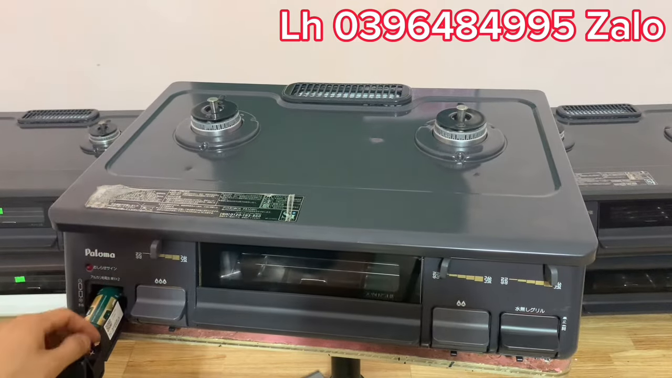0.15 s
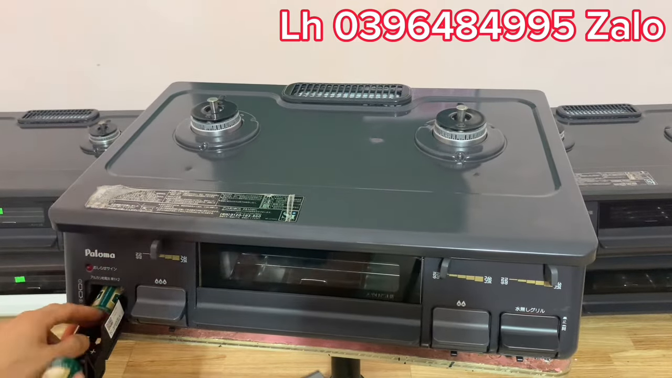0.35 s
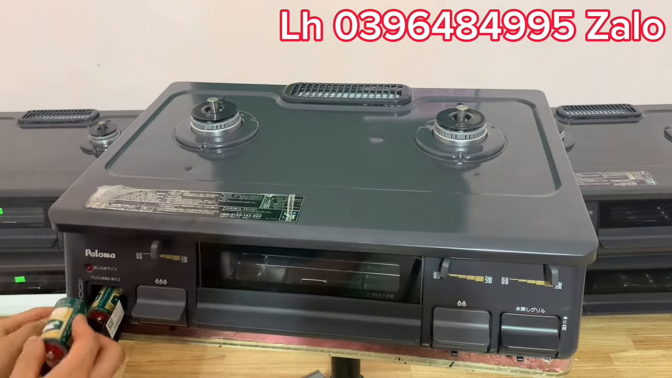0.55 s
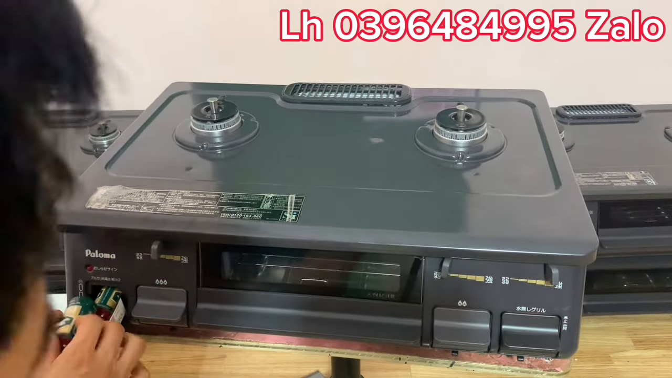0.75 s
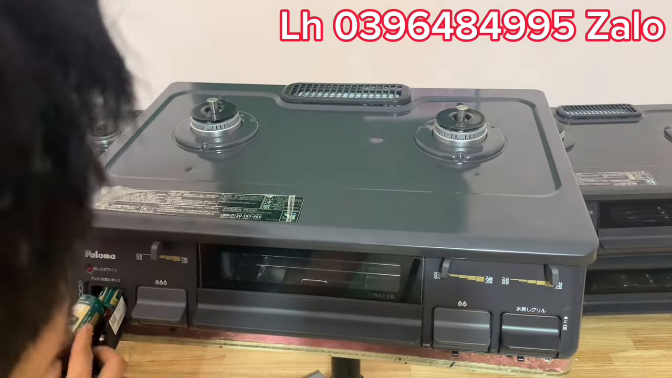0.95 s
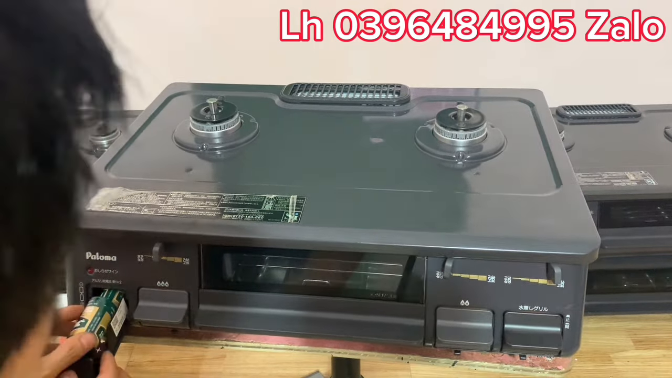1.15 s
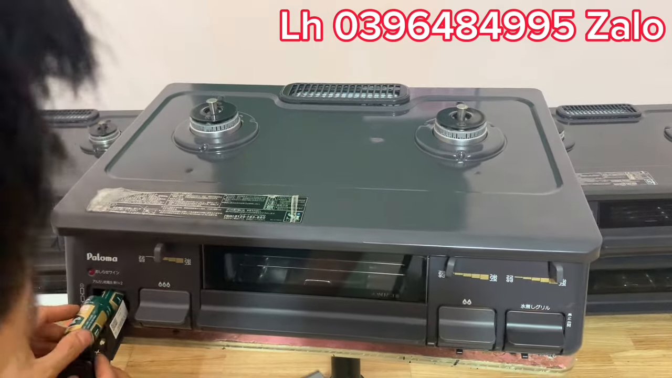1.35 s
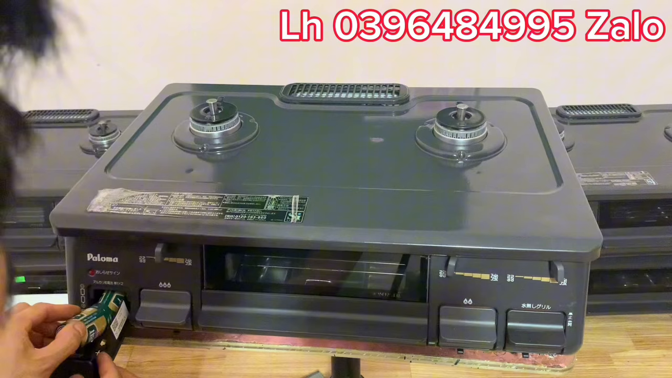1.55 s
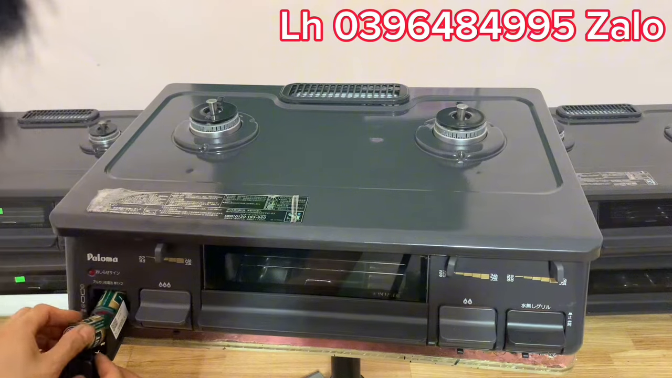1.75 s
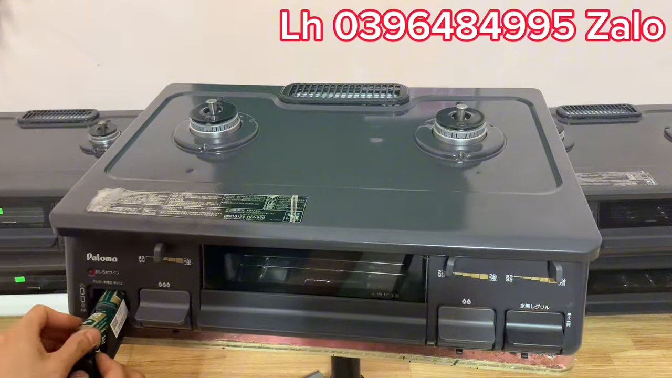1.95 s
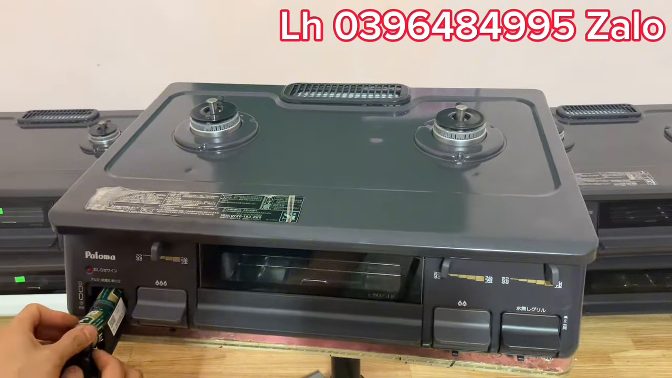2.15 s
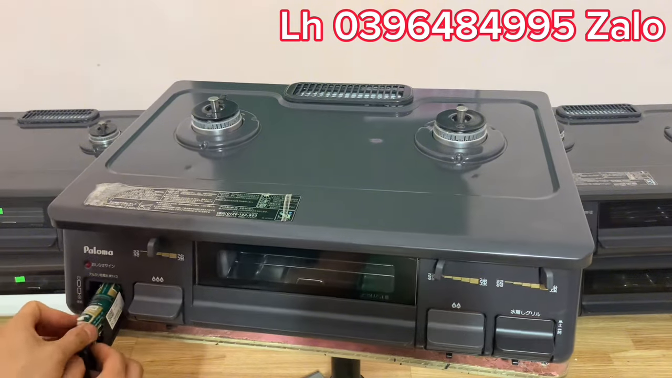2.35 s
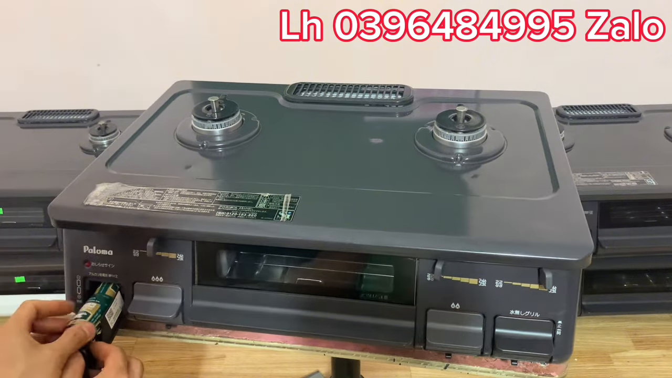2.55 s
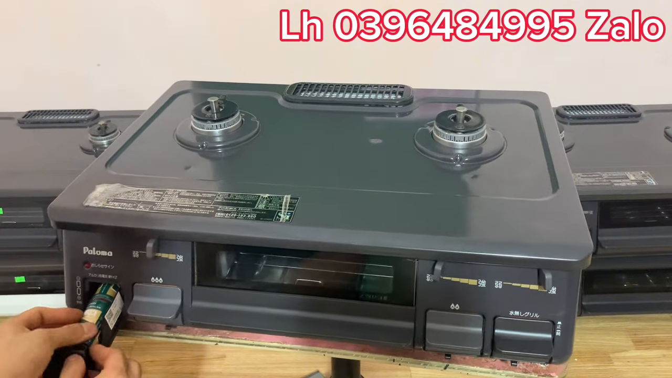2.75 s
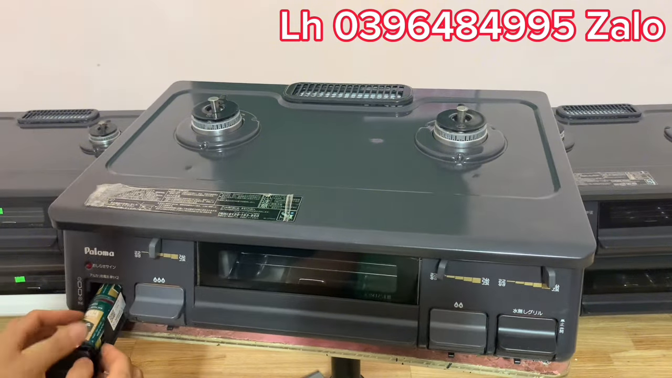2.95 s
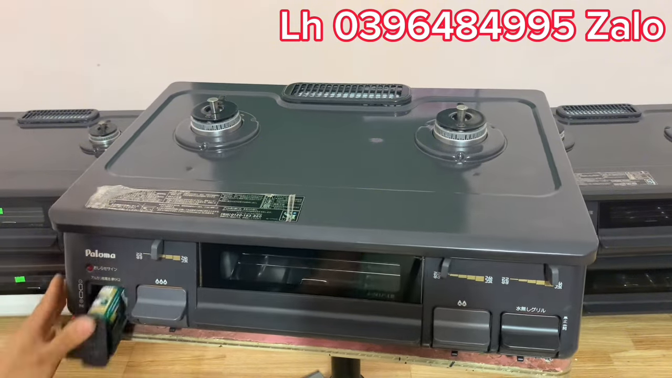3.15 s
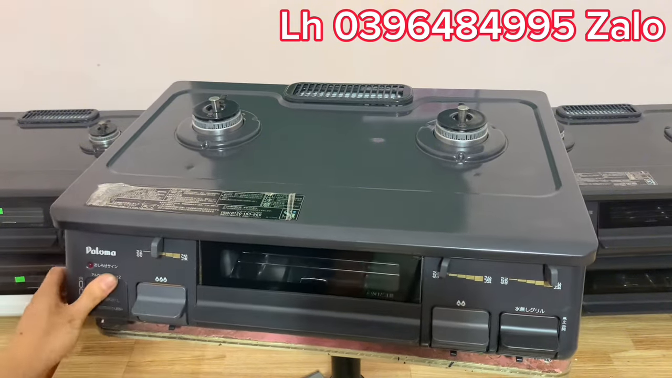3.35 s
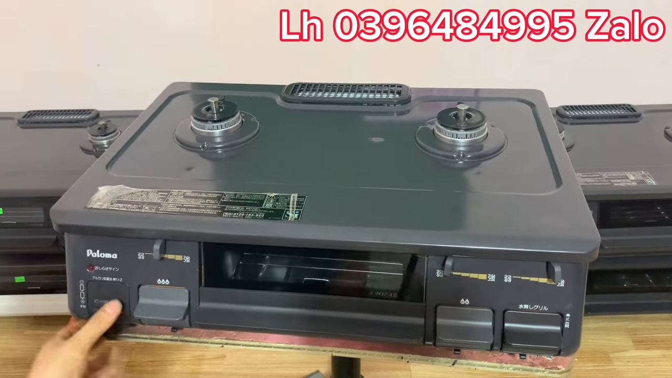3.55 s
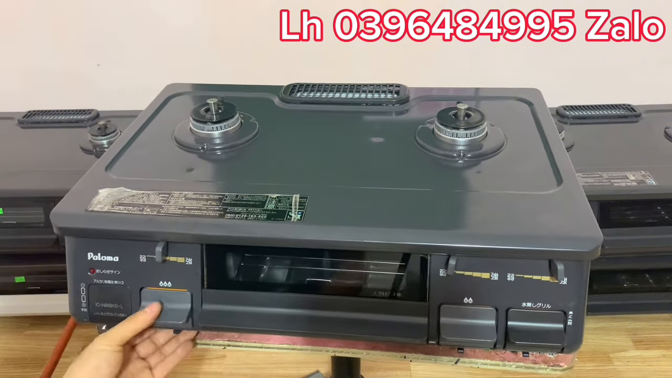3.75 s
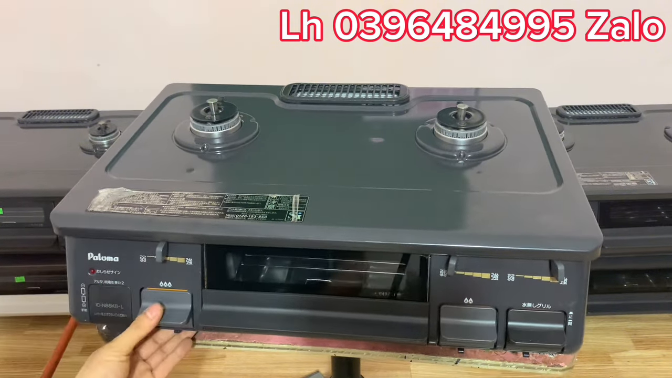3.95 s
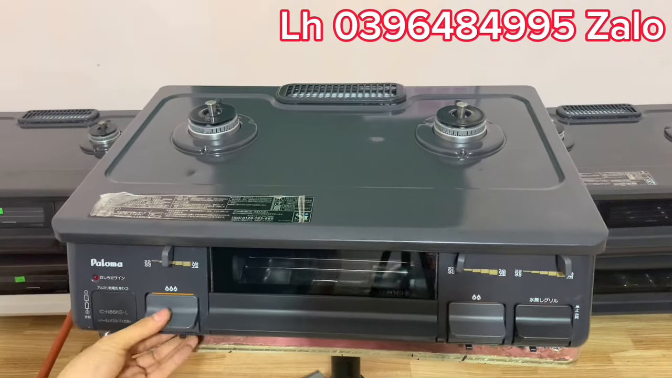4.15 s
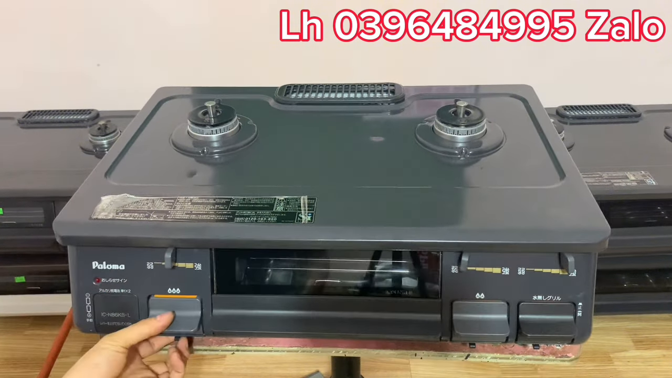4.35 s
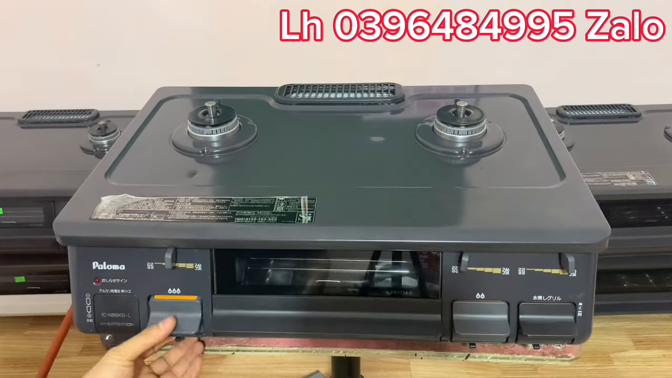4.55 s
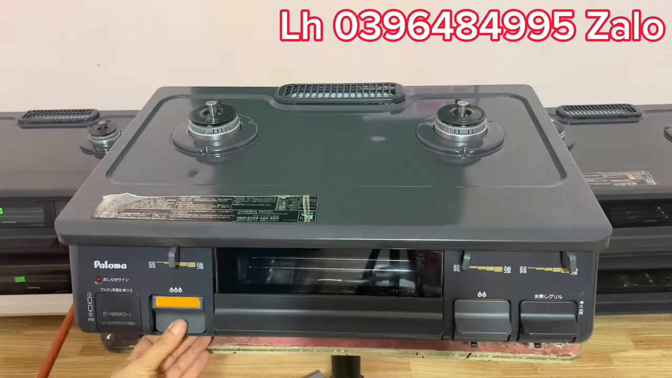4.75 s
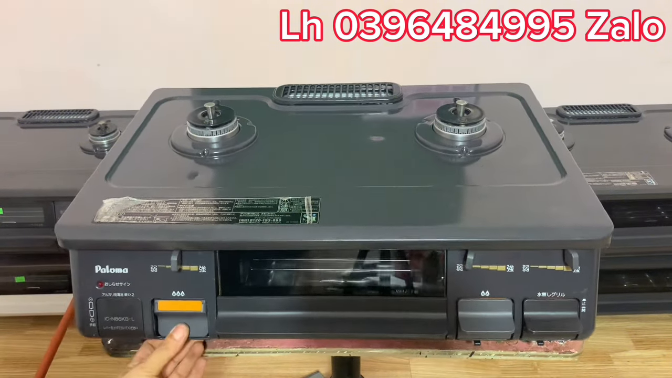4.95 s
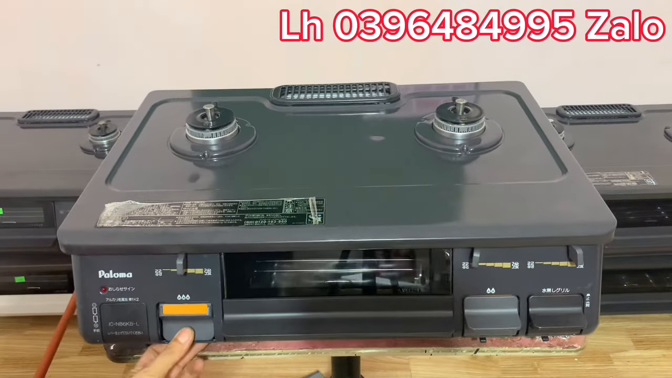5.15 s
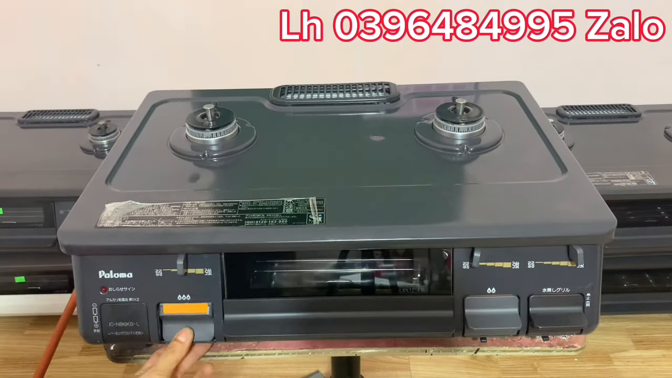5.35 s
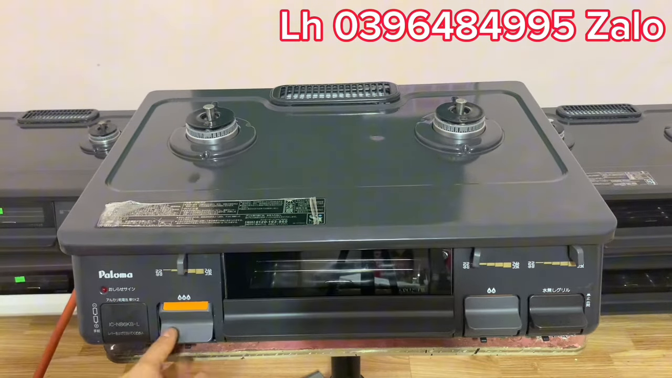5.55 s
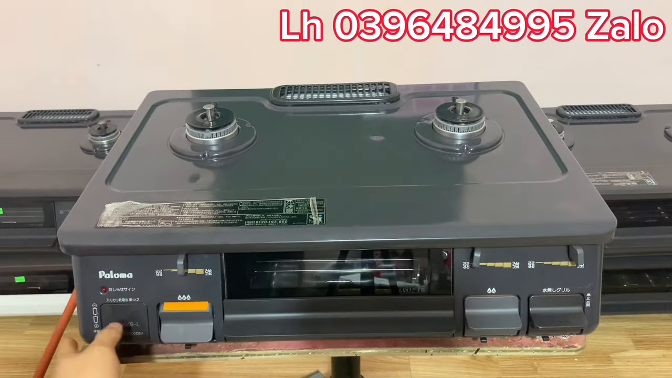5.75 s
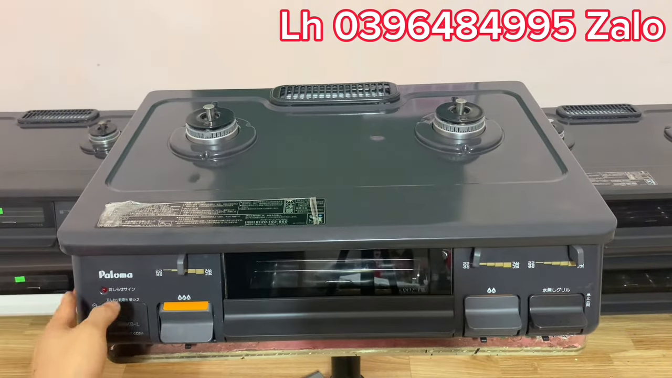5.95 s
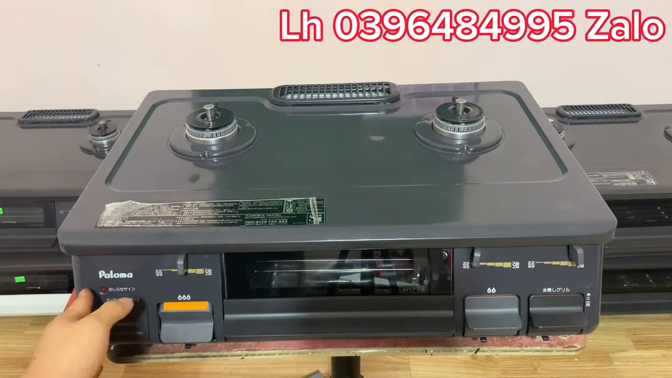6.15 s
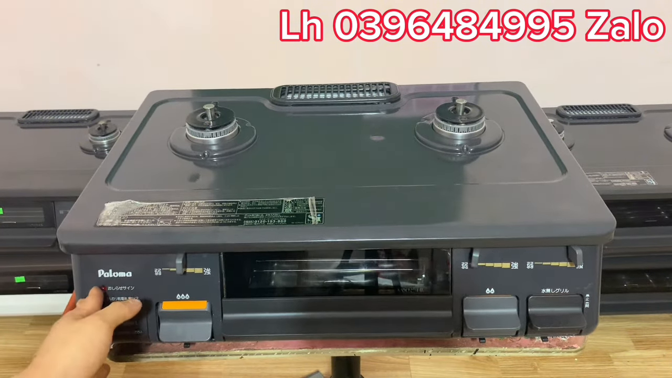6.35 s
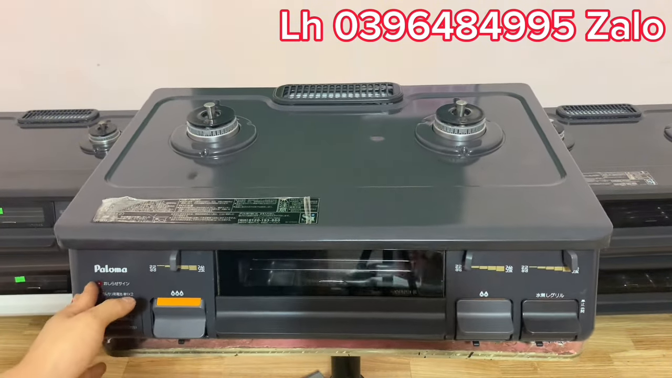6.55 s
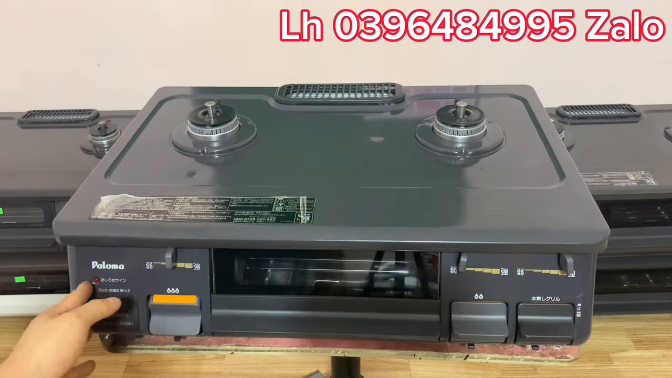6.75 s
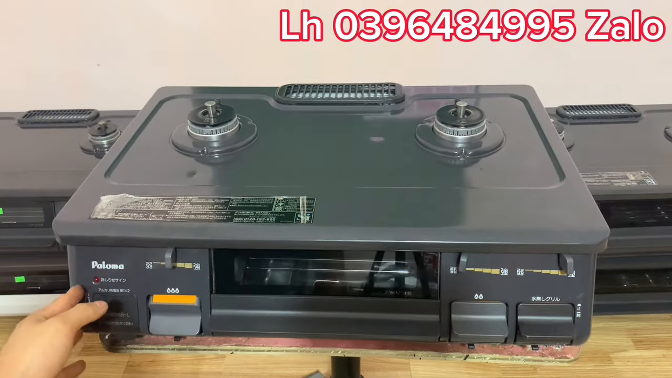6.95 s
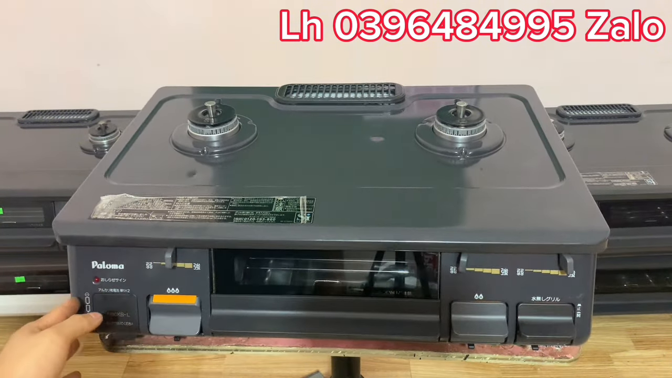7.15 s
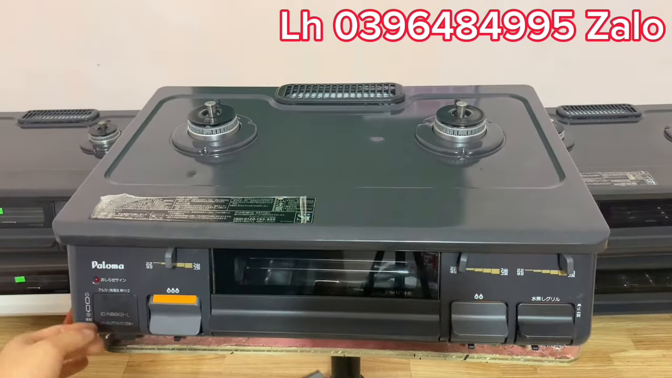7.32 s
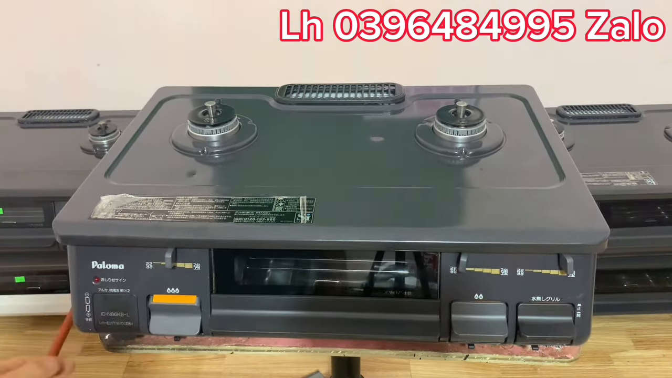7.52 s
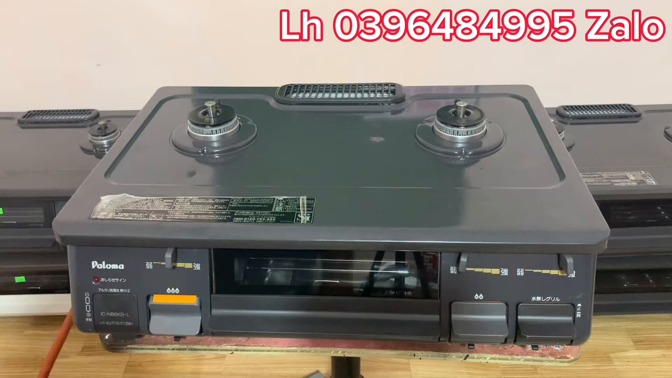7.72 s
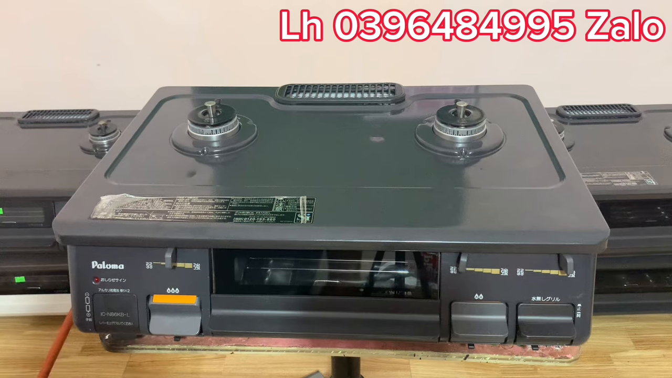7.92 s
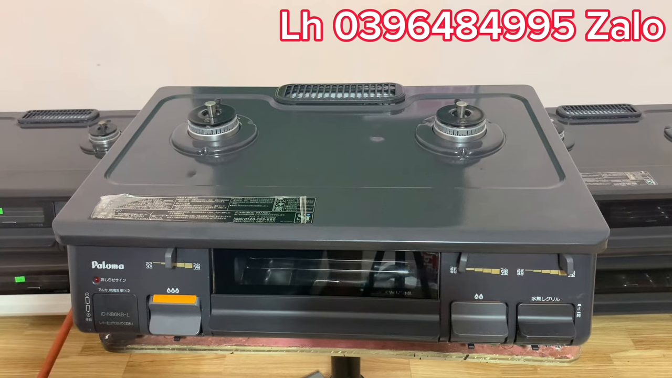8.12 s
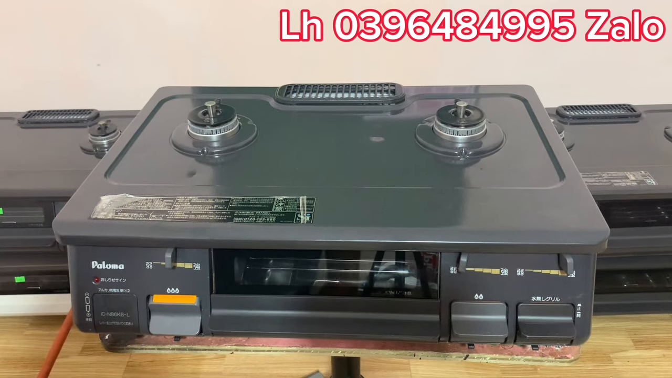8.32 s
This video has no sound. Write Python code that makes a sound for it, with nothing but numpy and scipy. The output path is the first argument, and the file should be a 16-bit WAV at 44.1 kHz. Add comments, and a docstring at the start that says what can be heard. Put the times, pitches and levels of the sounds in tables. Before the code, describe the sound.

Close stereo microphones face a table-top gas stove in a bare, reverberant room with a quiet low drone. From 0 s fingers rub and lightly tap the plastic and thin metal cabinet, with a small click at 0.3. At 0.7-0.8 a cluster of hard clacks plucks a battery spring, which twangs and buzzes. Softer taps and dull bumps follow from 1.0 to 2.0, a brighter knock at 2.35, and more small knocks with faint spring ringing to 2.9. After a brief scrape, the holder snaps shut crisply around 3.27. The burner key clicks at 3.75 and 4.33, then latches with hollow, ringing clunks at 4.6-4.7 as a faint gas hiss opens. From 4.9 until the end near 8.5, loud, dry, bright sparks crack evenly about 9.5 times a second, each with a short room echo. A soft thud lands near 6.97.

```python
"""Battery and igniter of a gas stove

Plastic knocks, scrapes and a ringing spring: a battery holder is fitted into a table-top stove and snapped
shut. The burner key is pushed in and latches; gas hisses and sparks crack about 9.5 times a second.
Rattles of contacts sound a plastic panel, decaying modes ring the metal, and shaped noise makes hiss and room.
Two closely spaced microphones listen from the front in a bare, echoing room."""
import sys
import numpy as np
from scipy import signal
from scipy.fft import rfft, irfft
from scipy.io import wavfile
from scipy.ndimage import uniform_filter1d

SR = 44100
rng = np.random.default_rng(int(sys.argv[2]) if len(sys.argv) > 2 else 0)


def transcribe(signal):
    """Save signal, clipped to [-1, 1], as a 16-bit WAV file at the path in sys.argv[1]."""
    frames = np.atleast_2d(signal).T
    limited = np.clip(frames, -1, 1)
    pcm = np.round(limited * 32767).astype(np.int16)
    wavfile.write(sys.argv[1], SR, pcm)


N = 374100

# fingers shifting on the cabinet: (time [s], level [dB]), and their colour: (frequency [Hz], level [dB per Hz])
HANDLING = [(0, -43.5), (.4, -53), (1.2, -50.5), (2.25, -57.5), (2.6, -49), (3.6, -57.5), (4.05, -59.5),
            (4.5, -52.5), (5.2, -61), (6.8, -62.5), (7.1, -58.5), (7.6, -65), (8.48, -59.5)]
HANDLING_COLOUR = [(28, -37.5), (55, -11), (110, -4.5), (200, 6.5), (400, 4), (750, -19), (1700, -10),
                   (5000, -25.5), (15000, -55)]
# low drone in the room, swelling once: (time [s], level [dB])
DRONE_LEVEL = [(0, -77), (2.1, -60), (3.6, -63.5), (3.85, -55.5), (4.4, -53), (4.7, -63.5), (8.48, -62.5)]
# colour of the room's noise floor: (frequency [Hz], relative level [dB per Hz])
FLOOR_COLOUR = [(28, -26), (50, -20), (80, -2.5), (130, -8.5), (260, -11.5), (500, -8.5), (900, -13),
                (3000, -32), (8000, -46), (15000, -42)]
# hard plastic knocks of holder, battery, lid and key, all levels relative: (time [s], thump [dB], clack [dB],
# rasp [dB], snap [dB], rattle length [s], direct sound [dB])
KNOCKS = [ (.004, -48.5, -47.5, -46.5, -53, 0.0051, -3), (0.2215, -62, -56, -52, -56, 0.021, -2),
          (.279, -41.5, -46.5, -46, -35, 0.00061, 4), (0.7254, -30.5, -26, -28.5, -34.5, 0.0018, -2),
          (0.7309, -30, -29, -38.5, -34.5, 0.0024, 6), (0.768, -38, -33, -64, -37, 0.0018, 2),
          (0.7735, -33, -40, -48, -40, 0.0026, 1), (0.795, -32.5, -34, -56, -36.5, 0.0019, -4),
          (0.816, -39, -39, -51, -50, 0.0016, 1), (1.036, -44, -49.5, -51, -51, 0.0023, -4),
          (1.099, -44.5, -45.5, -49, -49.5, 0.005, 4), (1.463, -48.5, -73, -71, -85, 0.0017, 15),
          (1.496, -54, -60, -56, -60, .002, 8), (1.64, -39, -47, -48, -53.5, 0.0087, 6.5),
          (1.8986, -66, -61, -58, -55.5, 0.0026, -6), (1.912, -41.5, -48.5, -46.5, -54, 0.0085, 7.5),
          (1.924, -39, -47.5, -50, -58, 0.0054, 7), (2.3457, -33, -37, -38, -31, 0.0031, 3.5),
          (2.53, -65, -49, -54.5, -47, 0.0026, 5), (2.611, -43.5, -49.5, -49, -42, 0.0038, 7.5),
          (2.7234, -35, -43, -46.5, -50.5, 0.0048, 9.5), (2.91, -68, -47.5, -53.5, -60.5, 0.0018, 3.5),
          (3.128, -64, -60.5, -53.5, -49, 0.0012, -3.5), (3.145, -56.5, -60.5, -61, -45.5, 0.03, -11.5),
          (3.172, -39.5, -46.5, -58, -52, 0.0064, -5), (3.187, -39, -42.5, -44, -45, 0.0064, 4),
          (3.259, -42.5, -29.5, -46.5, -44.5, 0.0055, 5.5), (3.2652, -39.5, -30, -36.5, -25.5, 0.0012, 2),
          (3.2696, -38.5, -30, -45.5, -24, 0.0012, 4), (3.274, -31.5, -29.5, -45.5, -33.5, 0.0015, 8),
          (3.278, -33.5, -29.5, -39, -43, 0.001, 5.5), (3.715, -53, -59, -58, -69, 0.004, -4.5),
          (3.7633, -43, -45, -41, -34, 0.0031, 0), (4.19, -50.5, -67.5, -65, -75, 0.0026, 3),
          (4.3265, -39, -37, -33.5, -29.5, 0.0024, 2), (4.61, -46, -52, -51, -72, 0.0057, -8),
          (4.638, -45.5, -44.5, -42, -43, 0.013, -5), (4.659, -48, -53, -58, -38.5, 0.004, 2.5),
          (4.67, -44.5, -43.5, -41.5, -42.5, 0.0064, 6), (5.444, -45, -57.5, -43.5, -42, 0.007, 3),
          (6.958, -51, -59.5, -76, -64, 0.0043, 3)]
# centres of thump, clack, rasp and snap: (frequency [Hz])
KNOCK_BANDS_HZ = [300, 1600, 4500, 9000]
# resonance of the plastic front panel: (frequency [Hz], level [dB per Hz])
PLASTIC = [(28, -5.5), (55, -15), (110, 8), (200, 18), (400, 20), (520, 15.5), (800, 8), (1400, 5.5),
           (2500, 11), (4500, 12), (6800, 2.5), (8800, 7.5), (11000, 3.5), (13000, 0.5), (15500, -11.5)]
# modes of the sheet-metal cabinet: (frequency [Hz], level [dB], t60 [s])
CABINET = [(54, -28, 1.43), (121, -11, 1.4), (154, -13.5, .6), (184.6, -8.5, 0.45), (245.5, -8, 0.55),
           (264.7, -6.5, 0.87), (336.4, -8, 0.56), (400, -2.5, 0.45), (417.6, -3, 0.5), (448, -7.5, 0.41),
           (571.5, -6, 1.02), (687, -7.5, 0.25), (1150, -11, 0.38), (1363, 10.5, 0.11), (1892, -4.5, 0.82),
           (2720, 0.5, 0.65), (2760, -1, .5)]
# after each knock the cabinet settles with a soft thud, its level set against the thump
SETTLE_S, SETTLE_DB, SETTLE_LENGTH_S = 0.036, -3.5, 0.015
# soft pushes of the hand against the cabinet: (time [s], relative level [dB])
PUSHES = [(.485, -42.5), (1.346, -44), (1.972, -39), (3.235, -30.5), (4.607, -41.5), (4.755, -51),
          (4.931, -54.5), (5.344, -45.5)]
PUSH_LENGTH_S = 0.0061
# a soft contact is dull: levels of thump, clack, rasp and snap ([dB])
SOFT_COLOUR = [1, -19.5, -28.5, -32.5]
# plastic slides on plastic: (time [s], length [s], relative level [dB], centre frequency [Hz])
SCRAPES = [(0.232, 0.056, -60, 9000), (0.465, 0.034, -58, 4430), (1.45, .06, -60, 3800),
           (3.093, 0.08, -51, 9000), (3.223, 0.045, -43, 8500), (4.066, 0.025, -62, 4250),
           (4.64, 0.047, -49, 2290), (4.654, 0.035, -44, 13500), (4.708, 0.053, -46, 3540),
           (5.411, 0.043, -50, 2300)]
SLIPS_PER_S, SCRAPE_FALL_DB = 260, 18  # the fall is per octave away from the centre
# plastic catches snap: (time [s], level [dB]), and their modes: (frequency [Hz], level [dB], t60 [s])
CATCH_SNAPS = [(.279, -33.5), (2.346, -54), (3.266, -22), (3.764, -39)]
CATCH = [(7800, 3, 0.049), (8450, 3, .05), (8800, -0.5, 0.12), (9300, -4, .1)]
# the battery plucks its contact spring: (time [s], level [dB])
PLUCKS = [(.727, -35.5), (.775, -35.5), (1.04, -48), (1.641, -50), (1.91, -55), (2.610, -46), (2.7248, -42),
          (2.91, -57), (3.278, -49)]
# modes of that spring: (frequency [Hz], level [dB], t60 [s])
SPRING = [(1440, -2, 0.54), (1520, -2, 0.84), (1657, -1, 0.81), (1691, 0.5, 0.73), (1785, -4.5, 0.69),
          (2080, -18, 0.34)]
# the spring starts sharp, sinks and buzzes: share of the pitch, time [s], width of its lines [Hz]
TWANG, TWANG_S, SPRING_BUZZ_HZ = 0.10, 0.04, 13
# soft bumps of the hand on the front panel: (time [s], level [dB], starting frequency [Hz])
BUMPS = [(1.951, -33, 129.8), (2.382, -36.5, 96), (3.301, -45, 120), (6.967, -35.5, 127)]
# the burner key is struck: (time [s], level [dB])
KEY_STRIKES = [(3.765, -56), (4.186, -71.5), (4.328, -45), (4.67, -52.5)]
# modes of the key and its lever: (frequency [Hz], level [dB], t60 [s])
KEY = [(398, 10, 0.92), (684, -7, 0.67), (1350, -4.5, .69), (2070, 0.5, 0.24), (3887, -3, 0.73),
       (4100, 1, 0.57), (4500, -1, 0.49), (4380, 4, 0.25), (4860, 2, 0.34), (6400, 8, 0.24)]
# the gas valve bottoms out: (time [s], level [dB]), and its modes: (frequency [Hz], level [dB], t60 [s])
VALVE_STRIKES = [(4.61, -40.5), (4.69, -41.5)]
VALVE = [(251.1, 3, 0.7), (300, -14, 0.25), (2190, -10, 0.2), (2300, -14, 0.27)]
# colour of the gas hiss: (frequency [Hz], relative level [dB per Hz])
GAS_COLOUR = [(300, -45), (1000, -35), (4500, 28), (9000, 8), (15000, -4)]
# faint steady tones while the gas is on: (frequency [Hz], level [dB], width [Hz])
GAS_TONES = [(120.7, -68, 3.7), (248, -73.5, 8.3), (505.5, -66.5, 0.43)]
# sparks: (time [s], snap [dB], body against the snap [dB], wall echo [dB])
SPARKS = [(4.9056, -3.0, 2.5, 0.0), (5.0105, -7.0, 7.5, 2.0), (5.1154, -2.5, 3.5, -3.0),
          (5.2208, -0.5, -1.5, -4.0), (5.3255, 0.5, 3.0, -7.5), (5.4303, -1.0, 1.5, -6.5),
          (5.5359, -1.0, 3.5, -7.0), (5.6406, -1.0, 1.0, -7.0), (5.7457, -2.0, 1.0, -4.5),
          (5.8509, -0.5, 2.5, -7.5), (5.9561, 1.0, 3.5, -8.5), (6.0615, 1.5, -1.0, -7.0),
          (6.1665, -0.5, 0.5, -6.0), (6.272, -1.0, 1.5, -6.5), (6.377, -1.0, 2.0, -6.5),
          (6.4823, -6.0, 5.5, -1.0), (6.5879, 1.0, 0.0, -4.0), (6.6935, 2.0, -4.0, -4.5),
          (6.7993, 1.0, -3.0, -4.5), (6.9047, 2.0, -1.5, -4.0), (7.0106, 2.0, -3.5, -5.0),
          (7.116, -0.5, 0.0, -1.5), (7.2215, 2.0, -1.5, -4.0), (7.3268, 1.0, -3.0, -3.0),
          (7.4325, 0.5, -2.0, -3.0), (7.538, 1.0, -0.5, -1.5), (7.6436, 0.5, -3.0, -1.5),
          (7.7492, 1.5, -1.0, -4.5), (7.8549, 3.0, -5.5, -5.5), (7.9604, 1.0, -2.5, -3.5),
          (8.0656, 2.0, -2.5, -5.0), (8.1714, 3.0, 0.5, -4.5), (8.277, 1.0, -1.0, -4.5),
          (8.3826, 1.0, -3.0, -4.5)]
# colour of a spark: (frequency [Hz], relative level [dB per Hz])
SPARK_COLOUR = [(200, -52), (700, -26.5), (1500, -11.5), (3000, -9.5), (5900, -6), (8500, -1.5),
                (10000, 2.5), (12000, 5), (14000, 0), (15500, -1)]
SPARK_DB, ARC_COLOUR_DB = -5, 2.5  # level common to all sparks; chance colour of each arc
BODY_EDGE_HZ = [4000, 7000]  # a spark's body lies below, its snap above
# each arc is heard again off the burner cap and off the wall
CAP_ECHO_S, CAP_ECHO_DB, WALL_DELAY_S = 0.00036, -9.5, 0.0038
# echoes off hob and table: (delay [s], relative level [dB])
NEAR_ECHOES = [(.0009, -13), (.0023, -13), (.003, -12), (.0046, -13), (.0067, -13), (.0116, -18)]
# decay of the room: (frequency [Hz], t60 [s])
ROOM_T60 = [(60, 0.58), (250, 0.69), (600, 0.75), (1700, 0.68), (4000, 0.75), (9000, 0.61), (15000, 0.37)]
# diffuse room tails of knocks and of sparks: (frequency [Hz], level [dB])
KNOCK_TAIL = [(60, -16), (150, -28), (400, -30.5), (750, -25.5), (1500, -20.5), (4000, -31), (7000, -25),
              (9500, -39), (12000, -30), (15000, -35.5)]
SPARK_TAIL = [(500, -31.5), (3000, -27), (7000, -25), (12000, -34.5), (15000, -29.5)]
# likeness of left and right in diffuse sound: (frequency [Hz], correlation [-1 to 1])
LIKENESS = [(50, 0.94), (380, 0.98), (600, 0.51), (900, 0), (2000, 0.0019), (5000, 0), (7000, 0.4),
            (9000, 1), (11700, 1), (15000, 0.99)]
EDGES_HZ = np.geomspace(25, 18000, 21)  # edges of the half-octave noise bands
LEFT_LAG_S, CUTOFF_HZ = 0.000215, 16000


def from_db(db):
    """Decibels to gain."""
    return 10 ** (np.asarray(db) / 20)


def rms_one(x):
    """Scale to unit rms."""
    return x / np.sqrt(np.mean(x ** 2) + 1e-20)


def unit_energy(x):
    """Scale to unit energy."""
    return x / np.sqrt(np.sum(x ** 2) + 1e-20)


def at_hz(points, hz):
    """Read a table on a log-frequency axis."""
    table_hz, values = np.transpose(points)
    return np.interp(np.log(hz), np.log(table_hz), values)


def bins_hz(size):
    """Spectrum frequencies, nudged up by 1 Hz to keep logarithms finite."""
    return np.fft.rfftfreq(size, 1 / SR) + 1


def fader(rows):
    """Gain per sample from (time [s], level [dB]) rows."""
    return from_db(np.interp(np.arange(N) / SR, *np.transpose(rows)))


def decay(t, t60):
    """Exponential fade that loses 60 dB in t60 seconds."""
    return np.exp(-np.log(1000) * t / t60)


def band(x, low, high, order=2):
    """Causal band-pass."""
    edges = [low, min(high, SR / 2 - 100)]
    return signal.sosfilt(signal.butter(order, edges, "band", fs=SR, output="sos"), x)


def add(track, s, sound):
    """Mix a sound in at a time."""
    at = max(0, round(s * SR))
    track[at:at + len(sound)] += sound[:max(0, len(track) - at)]


def convolve(x, response):
    """Play a mono track through a mono or stereo response."""
    return signal.fftconvolve(x[None], np.atleast_2d(response), axes=1)[:, :N]


def coloured(pulse, colour_db):
    """Causal (minimum-phase) filter; colour_db holds one level for each bin of the pulse's spectrum."""
    half = len(pulse) // 2
    cepstrum = irfft(np.log(from_db(colour_db)))
    # folding the cepstrum forward makes the filter causal
    cepstrum[1:half] *= 2
    cepstrum[half + 1:] = 0
    return irfft(rfft(pulse) * np.exp(rfft(cepstrum)))


def phase_wander(size, width_hz):
    """Random walk of phase that widens a spectral line."""
    return np.cumsum(rng.standard_normal(size)) * np.sqrt(2 * np.pi * abs(width_hz) / SR)


def wavering(hz, width_hz):
    """A tone of unit rms whose phase wanders."""
    phase = 2 * np.pi * hz * np.arange(N) / SR + phase_wander(N, width_hz)
    return rms_one(band(np.sin(phase), hz * 0.85, hz / 0.85))


def diffuse(colour, size, dying=False):
    """Stereo noise in half-octave bands; when dying, each band fades as the room does."""
    white = rng.standard_normal((2, 2, size))
    t = np.arange(size) / SR
    out = 0
    for k, (low, high) in enumerate(zip(EDGES_HZ, EDGES_HZ[1:])):
        hz = np.sqrt(low * high)
        fade = decay(t, at_hz(ROOM_T60, hz)) if dying else np.ones(size)
        # every band holds the energy that its width and decay give it
        strength = from_db(at_hz(colour, hz)) * np.sqrt(np.sum(fade ** 2) * 2 * (high - low) / SR)
        mid, side = (strength * unit_energy(noise * fade) for noise in band(white[k % 2], low, high))
        alike = np.clip(at_hz(LIKENESS, hz), -1, 1)
        out = out + np.sqrt((1 + alike) / 2) * mid + np.sqrt((1 - alike) / 2) * side * [[1], [-1]]
    return out


def room(colour, build_s):
    """One second of reverberation that builds up and dies away."""
    build = 1 - np.exp(-np.arange(SR) / SR / build_s)
    return diffuse(colour, size=SR, dying=True) * build


def near_echoes(strength_db):
    """The direct path followed by bounces off hob and table."""
    response = signal.unit_impulse(SR)
    for delay_s, db in NEAR_ECHOES:
        add(response, delay_s, from_db([db + strength_db]))
    return response


def ringing(modes, sharp=0, buzz_hz=0):
    """One second of decaying, unevenly struck modes; they may start sharp and sink, and buzz."""
    t = np.arange(SR) / SR
    bent_time = t + sharp * TWANG_S * (1 - np.exp(-t / TWANG_S))
    out = 0
    for hz, db, t60 in modes:
        wander = phase_wander(SR, buzz_hz) if buzz_hz else 0
        strength = from_db(db + rng.standard_normal()) * rng.choice([-1, 1])
        out = out + strength * np.sin(2 * np.pi * hz * bent_time + wander) * decay(t, t60)
    return out


def struck(events, modes, sharp=0, buzz_hz=0):
    """A small part rings on after each (time [s], level [dB]) contact."""
    track = np.zeros(N)
    for s, db in events:
        add(track, s, from_db(db) * ringing(modes, sharp, buzz_hz))
    return track


def fingers():
    """Fingers rub the cabinet: dark noise that follows the hand."""
    return fader(HANDLING) * rms_one(diffuse(HANDLING_COLOUR, size=N))


def drone():
    """Two close low tones beat unevenly as their phases wander."""
    return fader(DRONE_LEVEL) * rms_one(wavering(53, 3.1) + 0.95 * wavering(56, 4.8))


def room_floor(level_db=-63.0):
    """Steady diffuse noise of the room."""
    return from_db(level_db) * rms_one(diffuse(FLOOR_COLOUR, size=N))


def rattle(length_s, rub_db=-14, rise_s=0.0008, size=8192):
    """A quick, dying flurry of separate contacts over light rubbing, with equal energy at all pitches."""
    t = np.arange(size) / SR
    touching = rng.random(size) < 2200 / SR  # mean contacts per second
    sizes = from_db(4 * np.minimum(rng.exponential(1, size), 3)) * rng.choice([-1, 1], size)
    contacts = touching * sizes + from_db(rub_db) * rng.standard_normal(size)
    contacts *= np.exp(-t / max(length_s, 0.0005)) * (1 - np.exp(-t / rise_s))
    power = uniform_filter1d(np.abs(rfft(contacts)) ** 2, size=30)
    return coloured(contacts, -10 * np.log10(power + 1e-9))


def spot_resonances(hz):
    """Every spot of the plastic favours its own short-lived midrange and treble modes (dB)."""
    grid = np.arange(0, CUTOFF_HZ, 200)
    chance_db = 2.3 * np.interp(hz, grid, rng.standard_normal(len(grid)))
    return chance_db * np.clip(hz / 700 - 1, 0, 1)


def strike(levels_db, length_s):
    """A rattle of contacts through the plastic panel, with its own thump, clack, rasp and snap."""
    contacts = rattle(length_s)
    hz = bins_hz(len(contacts))
    colour_db = at_hz(PLASTIC, hz) + np.interp(np.log(hz), np.log(KNOCK_BANDS_HZ), levels_db)
    return coloured(contacts, colour_db + spot_resonances(hz))


def scrape(length_s, hz, rub_db=-14, size=8192):
    """Uneven slips over light rubbing that grow through the stroke and die quickly at its stop."""
    t = np.arange(size) / SR
    slipping = rng.random(size) < SLIPS_PER_S / SR
    slips = slipping * rng.uniform(1, 4, size) * rng.choice([-1, 1], size)
    stroke = np.minimum(t / length_s, 1) * np.exp(-np.maximum(t - length_s, 0) / 0.005)
    grains = unit_energy((slips + from_db(rub_db) * rng.standard_normal(size)) * stroke)
    octaves = np.abs(np.log2((np.fft.rfftfreq(size, 1 / SR) + 100) / hz))
    return coloured(grains, 10 - SCRAPE_FALL_DB * octaves)


def blows():
    """Every panel contact as (time [s], direct sound [dB], sound): knocks, thuds, pushes and scrapes."""
    soft = np.array(SOFT_COLOUR)
    for s, thump_db, *bright_db, length_s, exposed_db in KNOCKS:
        yield s, exposed_db, strike([thump_db, *bright_db], length_s)
        yield s + SETTLE_S, 0, strike(thump_db + SETTLE_DB + soft, SETTLE_LENGTH_S)
    for s, db in PUSHES:
        yield s, 0, strike(db + soft, PUSH_LENGTH_S)
    for s, length_s, db, hz in SCRAPES:
        yield s, 0, from_db(db) * scrape(length_s, hz)


def from_the_left(x, bass_db=-24.0):
    """Direct sound of the panel: little bass, and a midrange that reaches the left microphone first."""
    hz = bins_hz(N)
    lead_s = 0.0004 * np.interp(hz, [400, 2500, 4000, 9000], [0, 1, 1, 0])
    spectrum = rfft(x) * from_db(at_hz([(400, bass_db), (900, 0.0021)], hz))
    return irfft([spectrum, spectrum * np.exp(-2j * np.pi * hz * lead_s)], N)


def knocks(blow_db=26.5, cabinet_db=-46.0, direct_db=-2.0):
    """Each blow sounds the panel, cabinet and room; exposed spots are heard more directly."""
    plastic, facing, metal = np.zeros((3, N))
    for s, exposed_db, sound in blows():
        blow = from_db(blow_db) * sound
        add(plastic, s, blow)
        add(facing, s, from_db(direct_db + exposed_db) * blow)
        # each blow lands elsewhere and stirs the modes in its own mix
        add(metal, s, from_db(cabinet_db) * signal.fftconvolve(blow, ringing(CABINET)))
    direct = from_the_left(convolve(facing, near_echoes(strength_db=-13.0))[0])
    return direct + metal + convolve(plastic, room(KNOCK_TAIL, build_s=0.0004))


def catches():
    """Plastic catches ping when they snap: short, high modes."""
    return struck(CATCH_SNAPS, CATCH)


def contact_spring():
    """A plucked spring starts sharp, sinks to its own pitch and buzzes against the battery."""
    return struck(PLUCKS, SPRING, TWANG, SPRING_BUZZ_HZ)


def bumps(t60=0.11, sag=0.33):
    """A fingertip's low thud, its pitch sagging as the pressure eases."""
    track = np.zeros(N)
    t = np.arange(SR // 2) / SR
    fade = decay(t, t60)
    swell = 1 - np.exp(-t / 0.0063)
    for s, db, hz in BUMPS:
        phase = 2 * np.pi * np.cumsum(hz * (1 - sag * (1 - fade))) / SR
        add(track, s, from_db(db) * np.sin(phase) * fade * swell)
    return track


def burner_key():
    """The key and its lever ring in their own modes when struck."""
    return struck(KEY_STRIKES, KEY)


def valve_knock():
    """The gas valve bottoms out with a hollow knock of decaying modes."""
    return struck(VALVE_STRIKES, VALVE)


def gas(hiss_db=-61, opens_s=4.65, opening_s=0.074):
    """Shaped noise hisses with faint wavering tones once the valve opens."""
    opening = np.clip((np.arange(N) / SR - opens_s) / opening_s, 0, 1)
    hiss = from_db(hiss_db) * rms_one(diffuse(GAS_COLOUR, size=N))
    tones = sum(from_db(db) * wavering(hz, width_hz) for hz, db, width_hz in GAS_TONES)
    return opening * (hiss + tones)


def crack(body_db, size=256):
    """One spark: a sharp pressure jump whose colour shifts with the path that the arc takes."""
    hz = bins_hz(size)
    path_db = np.interp(hz, np.linspace(0, CUTOFF_HZ, 14), rng.normal(0, ARC_COLOUR_DB, 14))
    colour_db = at_hz(SPARK_COLOUR, hz) + path_db + np.interp(hz, BODY_EDGE_HZ, [body_db, 0])
    return unit_energy(coloured(signal.unit_impulse(size), colour_db))


def igniter(count=4, room_follows=0.15):
    """Each arc throws its snap unevenly in all directions, so the room varies less than the direct sound."""
    sparks = np.zeros(N)
    stirs = np.zeros((count, N))  # each feeds its own room tail
    for s, db, body_db, wall_db in SPARKS:
        for delay_s, path_db in ((0, 0), (CAP_ECHO_S, CAP_ECHO_DB), (WALL_DELAY_S, wall_db)):
            add(sparks, s + delay_s, from_db(SPARK_DB + db + path_db) * crack(body_db))
        spread = from_db(SPARK_DB + room_follows * db) * crack(room_follows * body_db)
        for stir, share in zip(stirs, unit_energy(rng.standard_normal(count))):
            add(stir, s, share * spread)
    direct = convolve(sparks, near_echoes(strength_db=-2.5))
    return direct + sum(convolve(stir, room(SPARK_TAIL, build_s=0.001)) for stir in stirs)


def scene():
    """Everything at the two microphones."""
    background = fingers() + drone() + room_floor()
    handling = knocks() + catches() + contact_spring() + bumps() + burner_key()
    return background + handling + valve_knock() + gas() + igniter()


def record(dry):
    """Treble reaches the left channel slightly late, the ports colour it unequally; deep bass and top are cut."""
    dry = signal.sosfilt(signal.butter(4, 36, "high", fs=SR, output="sos"), dry)
    hz = bins_hz(N)
    lag_s = LEFT_LAG_S * np.clip((hz - 1500) / 1500, 0, 1)
    # (frequency [Hz], left against right [dB]), half given to each side
    balance = [(800, 0), (1800, 0.2), (3500, 0.0), (5300, -2.5), (7200, 0.0)]
    tilt = from_db(at_hz(balance, hz) / 2)
    left = irfft(rfft(dry[0]) * tilt * np.exp(-2j * np.pi * hz * lag_s), N)
    right = irfft(rfft(dry[1]) / tilt, N)
    return signal.sosfilt(signal.ellip(8, 0.3, 70, CUTOFF_HZ, fs=SR, output="sos"), [left, right])


dry = scene()
out = record(dry)
transcribe(out)
```